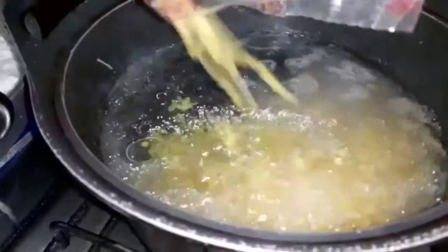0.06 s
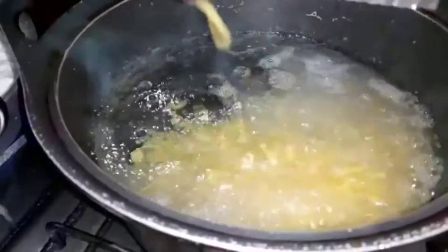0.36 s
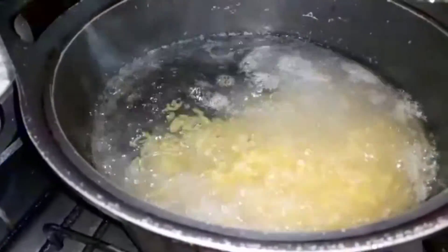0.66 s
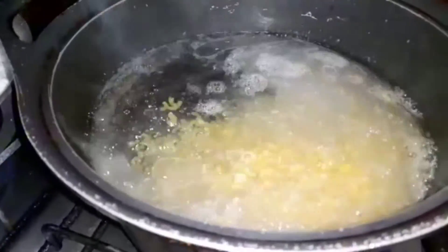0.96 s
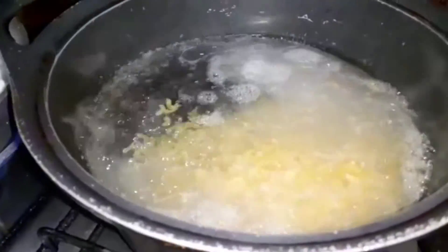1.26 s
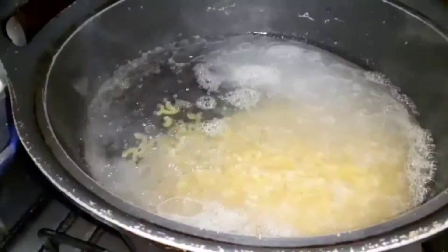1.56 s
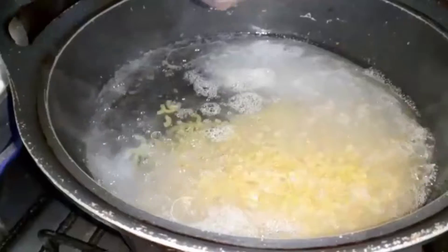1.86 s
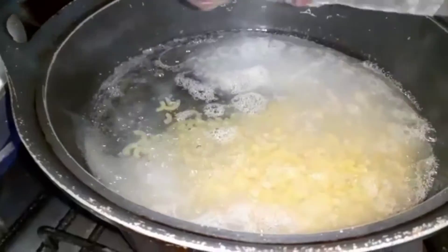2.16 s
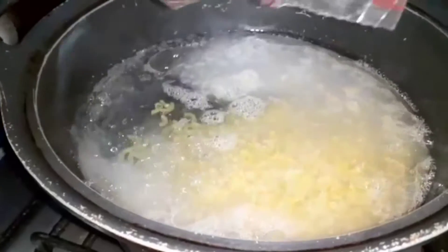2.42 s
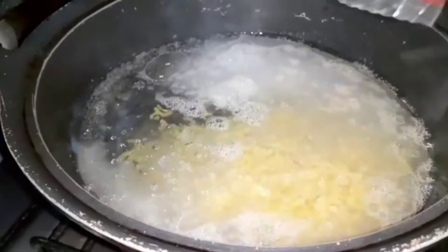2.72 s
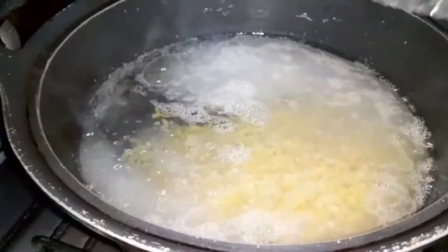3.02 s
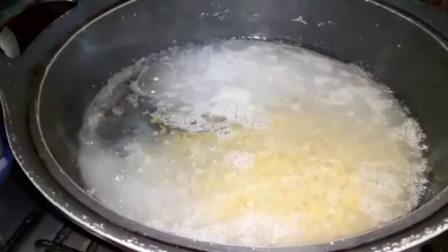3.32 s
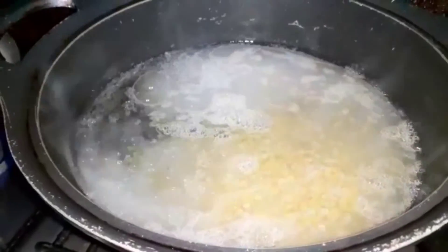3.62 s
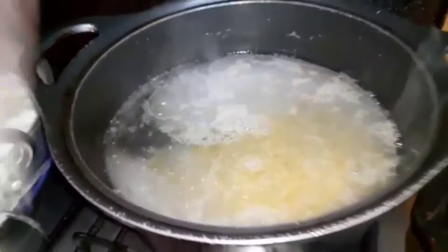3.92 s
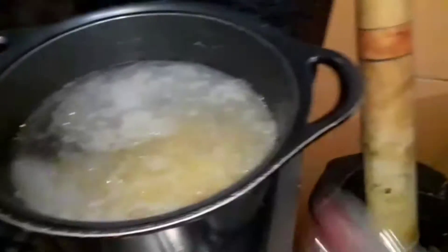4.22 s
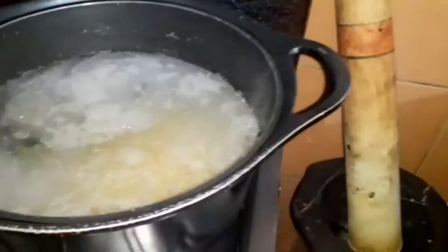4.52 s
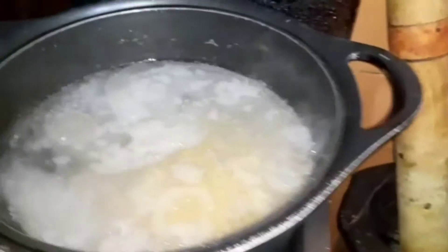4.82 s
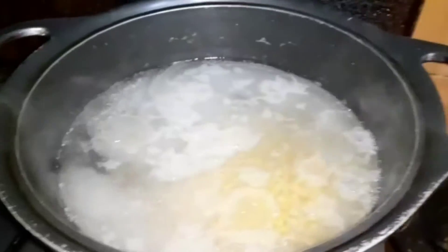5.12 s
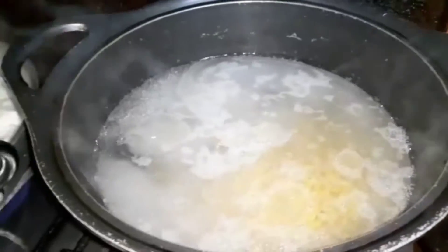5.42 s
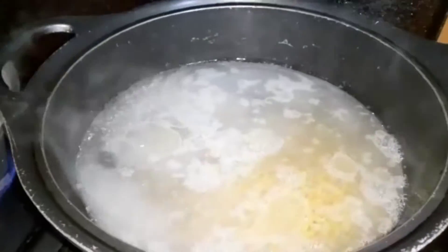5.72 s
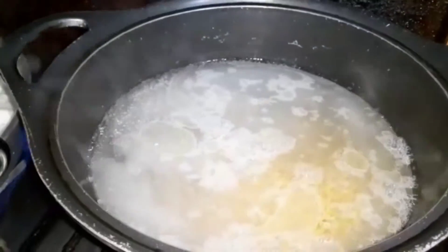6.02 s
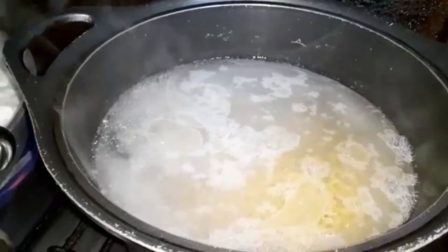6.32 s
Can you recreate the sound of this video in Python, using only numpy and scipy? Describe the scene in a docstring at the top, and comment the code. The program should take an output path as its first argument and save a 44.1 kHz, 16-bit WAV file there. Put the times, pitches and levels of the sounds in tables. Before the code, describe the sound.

Small pasta pours into simmering water with plops and spray; bubbles glug over a gas flame, and a crinkling bag is set down.

```python
"""A gas burner rumbles and drones under a cast pot of simmering water. Small dry pasta pours in from a
plastic bag with a splash, plops and spray, and the foam flares up; the last pieces drop in one by one.
After a second the simmer wells up, big steam bubbles glug and small ones pop. Near 3 s the bag swishes
over the pot and a thread of steam sings faintly. Then the bag crackles and slides, and at 4.7 s it is
put down beside the stove with a knock and a rattle while the pot simmers on."""
import sys
import numpy as np
from scipy import signal
from scipy.fft import rfft, irfft
from scipy.io import wavfile

SR = 44100
rng = np.random.default_rng(int(sys.argv[2]) if len(sys.argv) > 2 else 0)


def materialize(psi):
    """Save the field psi as 16-bit PCM at rate SR to the path in sys.argv[1].

    A 1-D psi becomes a single channel; in a 2-D psi each row is a channel.
    """
    bounded = np.clip(np.atleast_2d(psi).T, -1, 1)
    quanta = np.round(bounded * 32767).astype(np.int16)
    wavfile.write(sys.argv[1], SR, quanta)


N = 285322
TIME, FREQS = np.arange(N) / SR, np.fft.rfftfreq(N, 1 / SR)


def amp(db):
    """Decibels to gain."""
    return 10 ** (np.asarray(db) / 20)

def unit_rms(x):
    """Scales to rms 1."""
    return x / np.sqrt(np.mean(x ** 2) + 1e-20)

def curve_at(points, hz):
    """Reads a curve along a log-frequency axis."""
    f, value = np.transpose(points)
    return np.interp(np.log(hz + 1), np.log(f + 1), value)

def fader(points):
    """A fader ride through (time [s], level [dB]) points, as a gain per sample."""
    return amp(np.interp(TIME, *np.transpose(points)))

def fade(s, fall_db_per_s, db):
    """Gain that stays at db until time s, then dies away."""
    return amp(db - fall_db_per_s * np.maximum(TIME - s, 0))

def swell(s, db, rise_s, hold_s, fall_db_per_s):
    """Gain that rises to db at time s, holds, and dies away."""
    rise = np.clip(1 + (TIME - s) / rise_s, 0, 1)
    return rise ** 2 * fade(s + hold_s, fall_db_per_s, db)

def wander(hz):
    """Random modulation of rms 1, rolling off above the given rate."""
    return unit_rms(irfft(rfft(rng.standard_normal(N)) * np.exp(-(FREQS / hz) ** 2), N))

def add(mix, s, sound):
    """Lays a stereo sound into the mix at time s."""
    part = mix[:, max(round(s * SR), 0):][:, :sound.shape[1]]
    part += sound[:, :part.shape[1]]

def panned(db):
    """Left and right gains; a positive pan leans left."""
    return amp(np.array([db / 2, -db / 2]).reshape(2, -1))

def resonances(peaks):
    """The boost in dB that a set of resonant peaks gives at each frequency."""
    return sum(db / (1 + (2 * (FREQS - hz) / width) ** 2) for hz, width, db in peaks)

def causal_eq(x, spectrum):
    """Minimum-phase EQ: nothing rings ahead of an attack."""
    size = 8192
    db = curve_at(spectrum, abs(np.fft.fftfreq(size, 1 / SR)))
    log_gain = np.log(amp(np.maximum(db, -100)))
    taps = np.fft.ifft(np.exp(np.conj(signal.hilbert(log_gain)))).real[:size // 2]
    return signal.oaconvolve(x, taps[None], axes=1)[:, :N]

# how alike the two channels are: (frequency [Hz], likeness [clipped to 0-1])
STEREO_LIKENESS = [(130, 2.5), (180, 0.46), (300, 1.6), (500, 0.76), (800, 0.65), (1200, 0.16),
                   (1600, 0.62), (2300, .5), (2600, 0)]
# phase between the channels: (frequency [Hz], left lead [rad])
STEREO_LEAD = [(90, 0.42), (260, -0.63), (500, -0.78), (700, 0.037), (1000, -1.1), (1600, 1), (2400, 0.26),
               (4000, -0.43)]

def noise(spectrum, peaks=()):
    """A diffuse noise bed with optional resonances, narrow in the bass and wide in the treble."""
    left, unrelated = rfft(rng.standard_normal((2, N)))
    same = np.clip(curve_at(STEREO_LIKENESS, FREQS), 0, 1)
    right = (same * left + np.sqrt(1 - same ** 2) * unrelated) * np.exp(-1j * curve_at(STEREO_LEAD, FREQS))
    bed = irfft(np.array([left, right]) * amp(curve_at(spectrum, FREQS) + resonances(peaks)), N)
    return bed / np.std(bed.mean(0))

def grains(spectrum, per_s, spread_db, cycles, band_hz, rise=0.):
    """A swarm of tiny damped rings of many pitches and sizes; rise bends each one up as it dies."""
    out, pitches = np.zeros((2, N)), np.geomspace(*band_hz, 110)
    for hz in pitches:
        at, chance, side, lag = rng.random((4, max(int(per_s * N / SR / len(pitches)), 1)))
        age = np.arange(int(6 * cycles * SR / hz) + 2) * hz / SR / cycles  # in decay times
        ring = hz * np.exp(-age + 2j * np.pi * cycles * (age + rise * age * age / 2))
        sizes = amp(spread_db * np.minimum(-np.log(1 - chance), 4)) * rng.choice([-1, 1], len(at))
        shifts = np.exp(1j * (lag - .5) * min(hz / 450, 2 * np.pi))  # path difference between the ears
        for s, size, pan, shift in zip(at * N / SR, sizes, side, shifts):
            add(out, s, size * np.array([(1.5 - pan) * ring.imag, (.5 + pan) * (ring * shift).imag]))
    swarm = causal_eq(out, spectrum)
    return swarm / np.std(swarm.mean(0))

# the bright EQ shared by all clicks: (frequency [Hz], gain [dB])
CLICK_EQ = [(2500, 1), (3800, 0.5), (5000, 0), (7200, -0.5), (9400, 5.5), (11000, 1.5), (15000, 5.5)]

def clicks(rows, gain_db, ring_db, ring_s):
    """Each click is a burst of micro-impacts in one band, with a tail of reflections off pot and stove."""
    out, t = np.zeros((2, N)), np.arange(SR // 15) / SR
    hz = np.fft.rfftfreq(len(t), 1 / SR) + 1
    bandpass = signal.butter(3, (500, 16000), "bandpass", fs=SR, output="sos")
    for s, db, centre_hz, octaves, pan_db, decay_s in rows:
        envelope = np.exp(-t / decay_s) + amp(ring_db) * np.exp(-t / ring_s)
        burst = rng.standard_normal((2, len(t))) * envelope
        burst[:, 2] += .18 * np.sqrt(decay_s * SR)  # the first contact is one sharp snap
        burst /= np.std(burst[:, :SR // 100], axis=1, keepdims=True)
        band = np.sqrt(SR / 2 / np.log(2) / hz) / (1 + (np.log2(hz / centre_hz) / octaves) ** 2)
        click = signal.sosfilt(bandpass, causal_eq(burst, np.transpose([hz, 20 * np.log10(band)])))
        add(out, s, click * amp(db + gain_db) * unit_rms(panned(pan_db)))
    return irfft(rfft(out) * amp(curve_at(CLICK_EQ, FREQS)), N)

# fader ride of the flame's drone: (time [s], level [dB])
DRONE_RIDE = [(0.0, -34), (0.12, -40.5), (0.83, -43.5), (1.04, -31), (1.1, -58), (1.24, -25.5), (1.35, -34),
              (2.07, -29.5), (2.2, -43), (2.27, -25.5), (2.41, -54), (2.5, -30), (2.56, -35.5),
              (2.72, -27.5), (2.9, -42.5), (3.04, -26.5), (3.21, -27), (3.33, -46), (3.39, -32.5),
              (3.8, -34), (3.86, -23.5), (4.09, -47), (4.11, -38.5), (4.79, -29.5), (5.08, -42.5),
              (5.6, -33), (5.69, -48), (5.75, -31), (5.91, -33), (5.97, -62), (6.04, -33), (6.13, -43),
              (6.23, -29.5), (6.47, -31)]
# the flame's low end and its hiss: (frequency [Hz], gain [dB])
RUMBLE_EQ = [(20, -45), (55, -33.5), (70, -17), (86, -18.5), (112, 2.5), (135, 0.5), (170, -1.5),
             (235, -6.5), (310, -6.5), (338, -11.5), (390, -19.5), (425, -25), (520, -37.5), (900, -82)]
HISS_EQ = [(240, -26), (400, -7.5), (457, -3), (535, -8), (633, -7.5), (700, -3.5), (959, -8.5),
           (1350, -8.5), (1600, -6), (1800, -4.5), (1960, -7.5), (2200, -6), (2370, -6.5), (2600, -7.5),
           (2890, -20), (3300, -65), (7260, -120)]
# resonances of stove and kitchen, then of the air in the pot: (frequency [Hz], width [Hz], boost [dB])
STOVE_PEAKS = [(127, 17, 1), (142.4, 11, 2), (169.8, 10.7, 4), (208.4, 17, 2.5), (268, 23, 2.5),
               (293.2, 6.1, 5.5)]
POT_AIR_PEAKS = [(1597, 98, 6), (2207, 72, 7), (2512, 82, 6)]
DRONE_HZ, FLUTTER_HZ = 102.56, 13.6

def burner():
    """Turbulent flame: a steady rumble, a hiss, and a fluttering drone in the gap under the pot."""
    flutter = amp(-.5 + wander(FLUTTER_HZ))
    phase = 2 * np.pi * np.cumsum(DRONE_HZ + 1.206 * wander(4.4)) / SR
    drone = fader(DRONE_RIDE) * flutter * np.sin(phase)
    octave = amp(-44) * np.sin(2 * phase + .56 * wander(6.3))
    rumble = amp(-32 + .12 * wander(22)) * noise(RUMBLE_EQ, STOVE_PEAKS)
    hiss = amp(-48 + .5 * wander(25)) * noise(HISS_EQ, POT_AIR_PEAKS)
    return np.sqrt(2) * (drone + octave) + rumble + hiss

# fader ride of the fizz: (time [s], level [dB])
FOAM_RIDE = [(0, -56), (1.5, -50), (3.1, -50.5), (3.42, -49), (3.56, -51), (4.6, -52), (6.47, -53)]
# its airy tone: (frequency [Hz], gain [dB])
FOAM_EQ = [(1500, 2.5), (3000, -3.5), (4200, -1.5), (5300, -2.5), (7400, -0.5), (8400, -1), (9300, 2),
           (10200, -0.5), (12000, 2), (13500, -2), (15300, -1), (16000, 5)]

def foam():
    """Countless tiny bubbles burst on the surface, flaring up as the pasta goes in."""
    sparkle = grains(FOAM_EQ, per_s=2000, spread_db=1.8, cycles=2, band_hz=(3000, 15000))
    envelope = fader(FOAM_RIDE) + fade(0, fall_db_per_s=35, db=-38)
    return envelope * amp(wander(8.6)) * (noise(FOAM_EQ) + amp(-9) * sparkle)

# body of the splash and top end of the spray: (frequency [Hz], gain [dB])
SPLASH_EQ = [(250, 0), (480, -2), (750, -2), (1100, -1.5), (1800, 1.5), (2400, -7.5), (3000, -8.5),
             (3900, -9), (5500, -18), (10000, -25)]
SPRAY_EQ = [(1800, -27), (4000, 6), (6000, 4), (9500, 9.5), (13000, 6.5), (16000, 6)]
# resonances of the air in the pot: (frequency [Hz], width [Hz], boost [dB])
POT_PEAKS = [(680, 76, 4), (1810, 160, 2), (2700, 150, 10), (3620, 220, 5), (5810, 320, 9)]
POUR_END_S = .24

def pour():
    """Pasta hits the water in uneven clumps, churning up bubbles and spray; it thins, then runs out."""
    clumps = amp(wander(40))
    running_out = fade(POUR_END_S, fall_db_per_s=22, db=0)
    splash = clumps * fade(0, fall_db_per_s=26, db=-35) * running_out
    spray = clumps * fade(0, fall_db_per_s=25, db=-41.5)
    bubbles = grains(SPLASH_EQ, per_s=1800, spread_db=3, cycles=3.5, band_hz=(380, 6500), rise=.02)
    bubbles = irfft(rfft(bubbles) * amp(resonances(POT_PEAKS)), N)
    drops = grains(SPRAY_EQ, per_s=500, spread_db=4.2, cycles=3, band_hz=(3500, 15000))
    wash = amp(-3.5) * noise(SPLASH_EQ, POT_PEAKS)
    mist = amp(-16) * noise(SPRAY_EQ)
    return splash * (amp(-4.5) * bubbles + wash) + spray * (amp(-2.5) * drops + mist)

# air pockets dragged under by the pasta: (time [s], pitch [Hz], level [dB])
PLOPS = [(.005, 2700, -24), (.025, 1760, -26), (.026, 1380, -25), (0.08, 2680, -31), (.085, 3450, -30.5),
         (.109, 705, -26), (.110, 2630, -33), (.124, 1860, -23.5), (.130, 3510, -35), (0.172, 760, -29),
         (.175, 3610, -29), (.186, 930, -28.5), (.208, 1470, -26), (.219, 1780, -26.5), (.220, 4070, -31.5),
         (.230, 1230, -25.5), (.236, 860, -34), (.266, 1485, -29), (0.268, 1920, -27.5), (.336, 2040, -29),
         (.357, 1830, -37), (.368, 1370, -32.5), (.378, 2130, -33), (.388, 4200, -34), (.457, 1480, -33)]
PLOP_RISE_S, PLOP_DECAY_S, PLOP_GLIDE_PER_S = .0004, .0022, 4
SLAP_OCTAVES, SLAP_DECAY_S = 1.2, .0037

def plops():
    """Each clump slaps the water; the air it drags under rings briefly and rises in pitch."""
    slaps = [(s, db, hz, SLAP_OCTAVES, 0, SLAP_DECAY_S) for s, hz, db in PLOPS]
    out = clicks(slaps, gain_db=-15.5, ring_db=-13, ring_s=.008)
    t = np.arange(SR // 20) / SR
    envelope = (1 - np.exp(-t / PLOP_RISE_S)) * np.exp(-t / PLOP_DECAY_S)
    for s, hz, db in PLOPS:
        phase = 2 * np.pi * hz * (t + PLOP_GLIDE_PER_S * t * t / 2) + rng.normal(0, .6, (2, 1))
        add(out, s, amp(db + .5) * envelope * np.sin(phase))
    return out

# pasta hits: (time [s], level [dB], centre [Hz], width [octaves], pan [dB], decay [s])
PASTA_HITS = [(.084, -45, 9000, 1.5, -3, .001), (.1263, -47, 4500, 3, 0, .002),
              (.1736, -47, 6000, 3.4, -1, 0.0033), (.186, -48, 7000, 2, 0, .0015),
              (.2078, -40, 14000, 0.52, 0, .0015), (.2722, -35, 7400, 0.72, 1, 0.0022),
              (.281, -44, 6000, .8, 0, .0015), (.2919, -45, 12000, 1.6, -4, .002),
              (.3952, -44.5, 3500, 4.3, 5, 0.002), (.4315, -43, 14000, 0.46, -6, .0005),
              (.5085, -42, 11900, 0.39, 0, 0.00069), (.5095, -39.5, 2170, 0.38, 3, 0.00076),
              (.5761, -39, 1450, 0.75, 9, 0.0022), (.5943, -44.5, 1400, 2.5, 0, 0.0012),
              (.7211, -40.5, 1810, 1.6, 3, 0.0028), (.7333, -34, 1750, 0.4, 5, .002),
              (1.017, -38.5, 4260, 1.05, 0, 0.00092), (1.7159, -41.5, 1990, 1.6, 1, 0.0059),
              (1.7209, -33, 11500, 0.84, -4, 0.0022), (1.858, -31.5, 9400, 0.84, 0.5, 0.00067),
              (1.8682, -51, 9500, 1.2, -5, .001)]

def pasta_hits():
    """Single hard pieces land in the pot, each with a dry tick."""
    return clicks(PASTA_HITS, gain_db=1, ring_db=-14, ring_s=.005)

# pitched accents on the clicks: (time [s], pitch [Hz], level [dB], decay [s], pan [dB])
PINGS = [(.509, 10500, -36, .0033, -3), (1.7159, 930, -25.5, 0.002, 3), (1.7163, 1830, -31, 0.0033, -3),
         (1.8588, 6000, -27, 0.001, 0), (3.812, 1820, -31, 0.0013, 1), (4.2894, 1630, -26, 0.003, -11),
         (4.455, 1800, -24, 0.0014, -11), (4.525, 2400, -21, 0.0005, -6), (4.7032, 890, -32, 0.0033, -2),
         (4.7032, 1910, -22.5, 0.003, -2), (4.7029, 2380, -19.5, 0.0036, -4),
         (4.7033, 3920, -22.5, 0.0026, -10), (4.8295, 900, -26, .004, -3), (4.9545, 9420, -23, 0.0025, 10),
         (4.9548, 9216, -50, .018, 3)]

def pings():
    """Some clicks of pasta and bag ring with a clear pitch; the last touch sings on thinly."""
    out, t = np.zeros((2, N)), np.arange(SR // 2) / SR
    for s, hz, db, decay_s, pan_db in PINGS:
        add(out, s, panned(pan_db) * amp(db) * np.exp(-t / decay_s) * np.sin(2 * np.pi * hz * t))
    return out

# fader ride of the simmer, then the crests where water wells up: (time [s], level [dB])
SIMMER_RIDE = [(1.1, -57), (1.3, -46), (4, -49), (5, -52.5), (6.47, -51.5)]
SURGES = [(1.33, -43), (1.55, -59), (5.27, -48)]
# midrange tone of the bubbling: (frequency [Hz], gain [dB])
SIMMER_EQ = [(250, -1.5), (600, -2.5), (950, -4), (1300, -3.5), (1700, 1.5), (2600, -8.5), (4300, -10),
             (6000, -24), (12000, -39)]

def simmer():
    """Larger bubbles simmer, and well up now and then in a soft, low slosh."""
    bubbles = grains(SIMMER_EQ, per_s=500, spread_db=3.5, cycles=3.5, band_hz=(443, 2860), rise=.04)
    surges = sum(swell(s, db, rise_s=.12, hold_s=.011, fall_db_per_s=155) for s, db in SURGES)
    slosh = surges * amp(13) * noise(RUMBLE_EQ)
    bubbling = amp(-6.5) * bubbles + amp(-9.5) * noise(SIMMER_EQ)
    return slosh + (fader(SIMMER_RIDE) + surges) * bubbling

# big steam bubbles: (peak time [s], pitch [Hz], glide [octaves/s], level [dB])
GLUGS = [(1.171, 151, 1, -27), (1.62, 149.4, 2, -24), (1.642, 291, 4.5, -28.5), (2.142, 151.3, -7, -25),
         (2.14, 294, -5.5, -31), (3.478, 173, -10.5, -24), (5.293, 184, 4, -27), (6.157, 147, 3, -24.5)]
GLUG_RISE_S, GLUG_FALL_S = .012, .016

def glugs():
    """Each big bubble gives a few low cycles that glide as it swells or shrinks."""
    out, t = np.zeros((2, N)), np.arange(-SR // 10, SR // 10) / SR
    envelope = np.exp(-(t / np.where(t < 0, GLUG_RISE_S, GLUG_FALL_S)) ** 2)
    for s, hz, glide, db in GLUGS:
        turns = np.cumsum(hz * 2 ** (glide * t)) / SR + rng.random()
        add(out, s + t[0], panned(0) * amp(db) * envelope * np.sin(2 * np.pi * turns))
    return out

# bubble pops: (time [s], level [dB], centre [Hz], width [octaves], pan [dB], decay [s])
POPS = [(1.2895, -38, 700, 0.6, 6, .003), (1.3385, -36, 1400, 0.84, 5, 0.0022),
        (1.349, -40, 790, 0.62, 4, .005), (1.468, -42, 800, 0.55, 4, 0.0037),
        (1.508, -45, 1700, 1, 10, 0.0018), (1.5577, -37, 1300, 0.87, 4, 0.0018),
        (1.5899, -42.5, 1200, 1.3, 4, .0035), (1.606, -44, 1900, 0.64, 2, .002),
        (2.0878, -47.5, 2000, 3.1, 0, 0.0012), (2.199, -41, 4400, 0.2, -2, .0025),
        (2.3457, -48, 3000, 1.6, 3, 0.0036), (2.37, -49, 3000, 1.2, 0, .002),
        (2.426, -47, 4000, 0.31, -2, 0.0022), (2.603, -52.5, 7000, 1.5, 0, .004),
        (2.8181, -44.5, 1300, 1.3, 4, 0.0015), (5.5171, -50, 15000, .4, 9, .0005),
        (5.7603, -51, 13000, 1.6, -2, 0.0027)]

def pops():
    """Single bubbles burst on top of the simmer."""
    return clicks(POPS, gain_db=-1, ring_db=-13, ring_s=.008)

# breathy tone of the swish: (frequency [Hz], gain [dB])
SWISH_EQ = [(1500, -27), (3200, -4), (5000, -4), (7000, -7), (12000, -13)]

def bag_swish():
    """The bag swings over the pot in one short whoosh."""
    return swell(2.95, db=-50.5, rise_s=.043, hold_s=.014, fall_db_per_s=137) * noise(SWISH_EQ)

# fader ride of the steam: (time [s], level [dB])
STEAM_RIDE = [(3.0, -74), (4.8, -68), (5.6, -72), (5.9, -68), (6.47, -72)]
# its narrow whistle band: (frequency [Hz], gain [dB])
STEAM_EQ = [(5500, -32), (6450, -10), (6720, 8), (7000, -16), (8000, -36)]

def steam():
    """A thin thread of steam sings faintly."""
    return fader(STEAM_RIDE) * noise(STEAM_EQ)

# snaps and taps of the bag: (time [s], level [dB], centre [Hz], width [octaves], pan [dB], decay [s])
CRACKLES = [(3.729, -40, 2000, 0.78, 2, 0.006), (3.8122, -43.5, 6000, 4.2, 0, 0.0011),
            (3.9497, -36.5, 3800, 2.6, 4, 0.0015), (3.9735, -32, 3780, 2.1, 3.5, 0.0016),
            (4.0536, -41.5, 2400, 1.2, 9, 0.004), (4.071, -47, 3800, 0.72, 5, .002),
            (4.1381, -42, 1900, 0.96, 6, .005), (4.2299, -38, 6400, 1.7, 2, 0.00063),
            (4.2894, -35.5, 3900, 1.5, -0.5, 0.0027), (4.3351, -39.5, 1720, 1.15, -4, 0.0018),
            (4.3663, -41, 1780, 0.64, -1, .001), (4.412, -54, 4000, 0.63, -2, .001),
            (4.4555, -33.5, 2020, 0.57, -7, 0.0017), (4.5142, -36.5, 1710, 0.88, -5, 0.0025),
            (4.525, -30, 2620, 1, -7, 0.00059), (4.564, -35.5, 3000, 0.65, -5, 0.004),
            (4.5625, -36, 9300, 0.22, -5, .003), (4.5938, -38.5, 900, 0.8, -4, 0.0017),
            (4.7032, -29.5, 3600, 1.2, -2, 0.0035), (4.7062, -30, 2880, 1.3, -10, .003),
            (4.7034, -30, 12000, 0.46, -11, 0.0032), (4.7487, -40, 4500, 5.2, -10, 0.0027),
            (4.7998, -35.5, 1890, 0.7, -7, .002), (4.8215, -31.5, 3200, 0.94, -12, 0.0015),
            (4.8215, -33, 11000, 0.96, -15, 0.0016), (4.8295, -30.5, 2220, 1.8, 3, 0.0025),
            (4.8295, -31, 14000, 0.43, -15, .0025), (4.8595, -40, 2000, 1, -8, .002),
            (4.869, -46, 2200, 1, -3, .002), (4.9545, -34, 13000, 0.5, 7, 0.00089)]

def bag_crackle():
    """Creases snap in the plastic, and the bag knocks down."""
    return clicks(CRACKLES, gain_db=-1, ring_db=-14.5, ring_s=.0048)

# slides of the bag: (peak time [s], level [dB], pan [dB])
SLIDES = [(3.985, -53, 1), (4.577, -37, 0.5), (4.72, -48, 2), (4.84, -48, 1)]
# sheen of the plastic film: (frequency [Hz], gain [dB])
FILM_EQ = [(2500, -20), (5000, -12), (8000, -4), (9500, 1), (11000, 0), (14500, 2), (16000, 2.5)]

def bag_slide():
    """The film slides in short strokes, a bright hiss flecked with crinkles."""
    strokes = sum(panned(pan_db) * swell(s, db, rise_s=.1, hold_s=.0086, fall_db_per_s=215)
                  for s, db, pan_db in SLIDES)
    crinkles = grains(FILM_EQ, per_s=1500, spread_db=3, cycles=2, band_hz=(4000, 15000))
    return strokes * (amp(-7) * crinkles + amp(-.5) * noise(FILM_EQ))

# shifts of the pasta in the bag: (time [s], hold [s], level [dB])
RATTLES = [(4.006, 0.12, -39.5), (4.493, .06, -60), (4.727, .002, -21), (4.846, 0.04, -35.5)]
# dry tone of the rattle: (frequency [Hz], gain [dB])
RATTLE_EQ = [(200, -11), (370, -3), (500, -5), (900, 4), (1200, -3), (1700, 1.5), (2400, -5), (3200, -4.5),
             (4000, -8), (6000, -10), (10000, -17)]

def bag_rattle():
    """Dry pieces clatter together as they shift inside the bag."""
    shifts = sum(swell(s, db, rise_s=.024, hold_s=hold, fall_db_per_s=205) for s, hold, db in RATTLES)
    pieces = grains(RATTLE_EQ, per_s=1500, spread_db=2.3, cycles=4, band_hz=(330, 7000))
    return shifts * amp(-13) * (pieces + noise(RATTLE_EQ))

# blows of the landing bag: (time [s], level [dB])
KNOCKS = [(4.704, -33), (4.828, -52)]
# modes of the surface under it: (frequency [Hz], level [dB], t60 [s])
SURFACE_MODES = [(375.6, 0.5, 0.3), (924, 5, 0.16), (1670, 2, 0.18), (1970, -2, 0.072), (2160, -1, 0.12),
                 (2370, -8, .1), (2660, -3, 0.092), (3930, -11, .2)]

def knocks():
    """The bag lands on a hollow surface and sets it ringing."""
    out, t = np.zeros((2, N)), np.arange(SR // 2) / SR
    for s, blow_db in KNOCKS:
        for hz, db, t60 in SURFACE_MODES:
            phase = 2 * np.pi * hz * t + rng.normal(0, .7, (2, 1))
            add(out, s, amp(blow_db + db - 60 * t / t60) * np.sin(phase))
    return out

# the kitchen's short reverb: (frequency [Hz], t60 [s])
KITCHEN_DECAY = [(300, 0.23), (1500, 0.19), (4000, 0.26), (7000, 0.19), (16000, 0.083)]

def kitchen(x):
    """Sparse reflections of random sign, each band dying at its own speed."""
    taps = rng.choice([-1., 1.], (2, SR // 2)) * (rng.random((2, SR // 2)) < .08)
    taps[:, :SR // 400] = 0  # pre-delay
    hz, t, bands = signal.stft(taps, SR, nperseg=256)
    tail = signal.istft(bands * amp(-60 * t / curve_at(KITCHEN_DECAY, hz)[:, None]), SR)[1]
    return signal.oaconvolve(x, tail / np.linalg.norm(tail[0]), axes=1)[:, :N]

def scene():
    """Pot and bag close up, each with a reverb send, over a dry bed of flame, foam and steam."""
    pot = pasta_hits() + pour() + plops() + pops() + simmer() + glugs()
    beside = bag_crackle() + bag_swish() + bag_slide() + bag_rattle() + knocks() + pings()
    reverb = amp(-8) * kitchen(pot) + amp(-9.5) * kitchen(beside)
    return pot + beside + reverb + burner() + foam() + steam()

# balance between the two microphone ports: (frequency [Hz], pan [dB])
PORT_BALANCE = [(100, -1.06), (400, -.5), (800, 1), (1300, -2.5), (1550, -4), (1850, -3.5), (2250, -12),
                (2700, -1.5), (3300, -1), (11000, -0.6), (13300, 0), (15500, 0)]
HIGH_CUT_HZ = 15900

def record(dry):
    """The two microphone ports colour the sound differently; a steep high cut trims the top."""
    ports = panned(curve_at(PORT_BALANCE, FREQS))
    heard = irfft(rfft(dry) * ports / ports.mean(0), N)
    high_cut = signal.firwin(511, HIGH_CUT_HZ, window=("kaiser", 9), fs=SR)
    return signal.oaconvolve(heard, high_cut[None], "same")


dry = scene()
out = record(dry)
materialize(out)
```